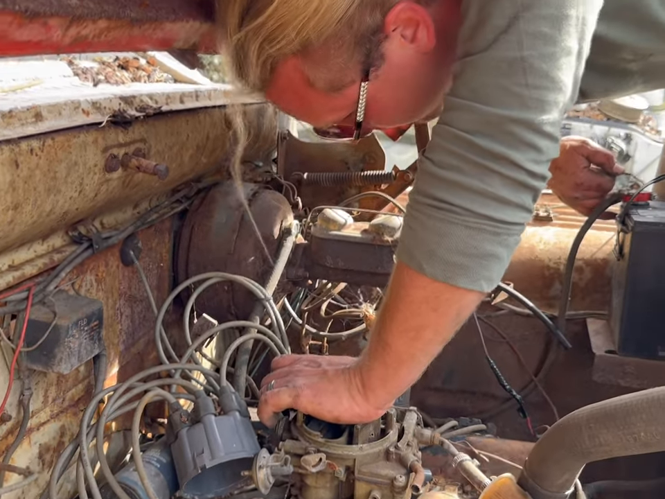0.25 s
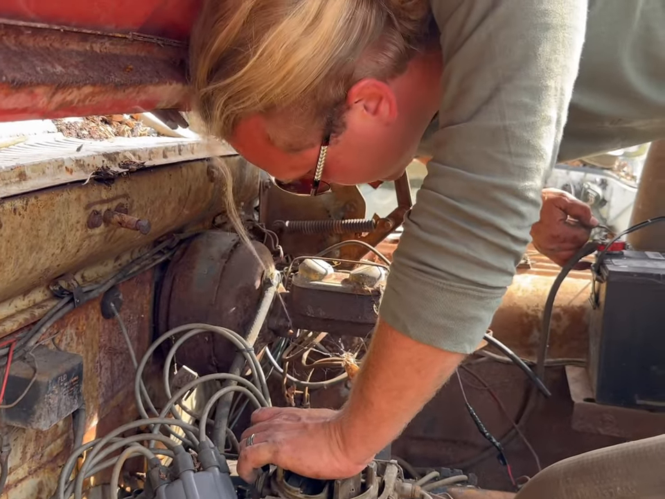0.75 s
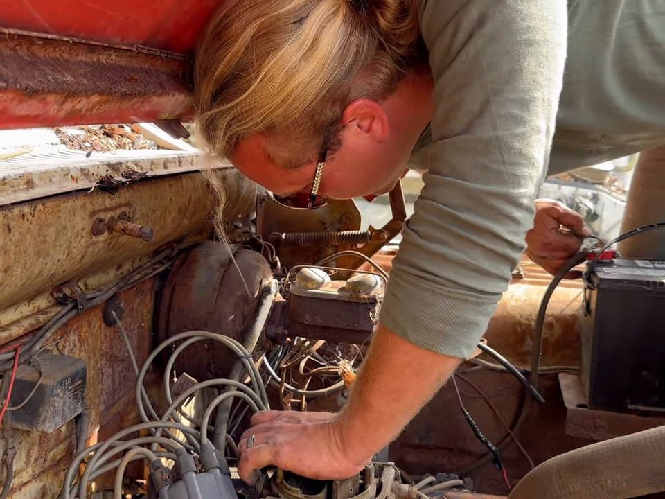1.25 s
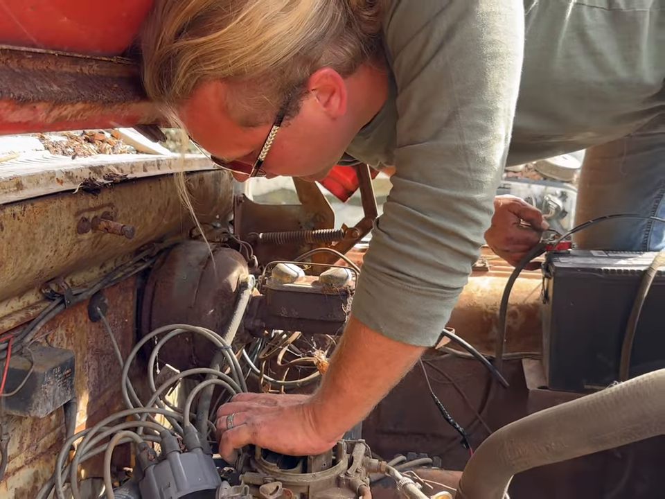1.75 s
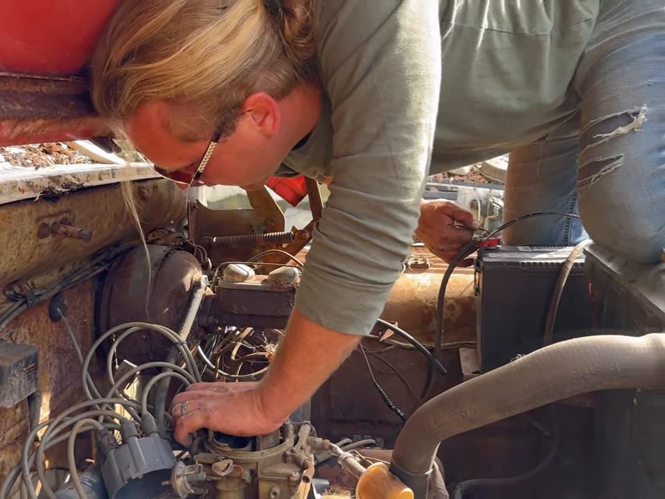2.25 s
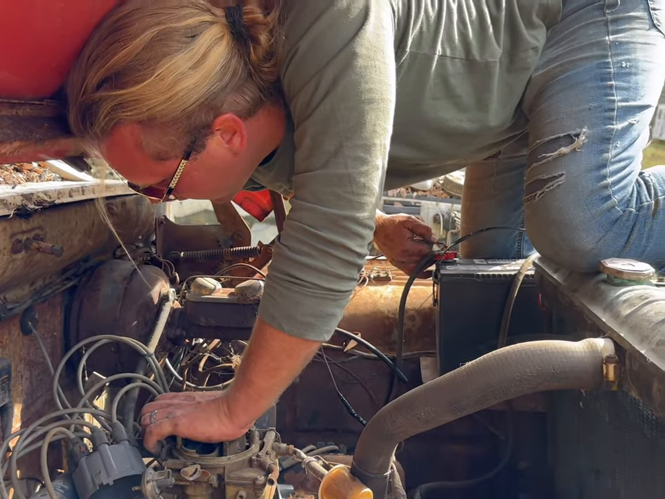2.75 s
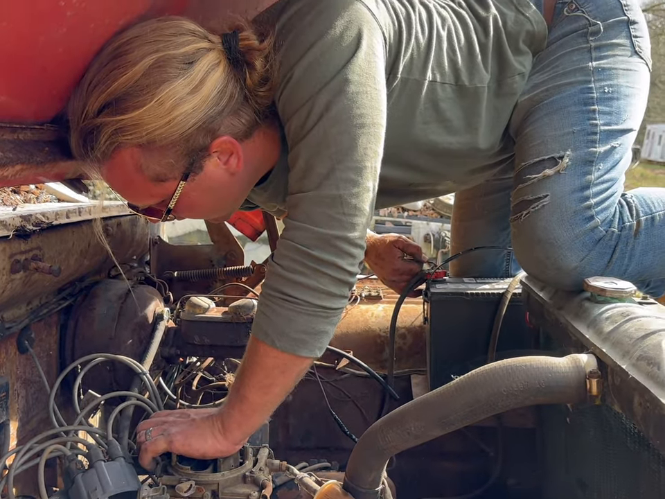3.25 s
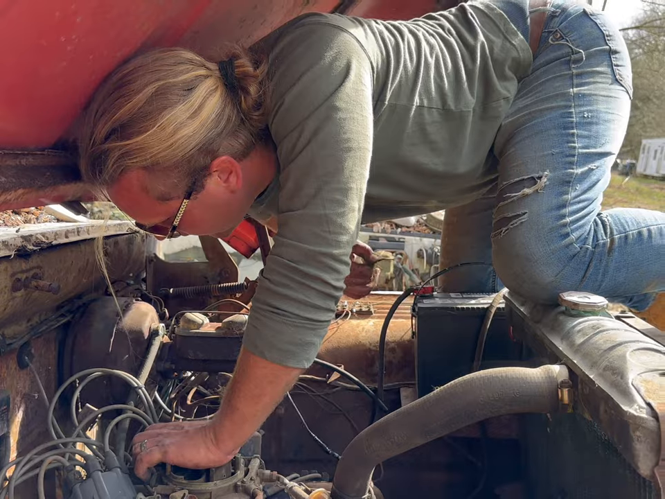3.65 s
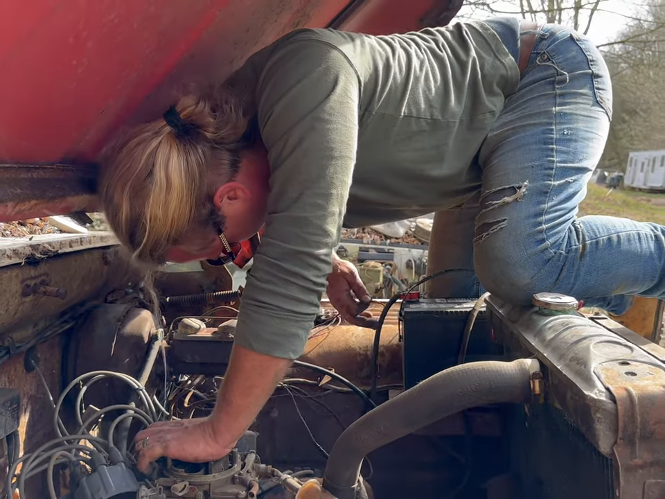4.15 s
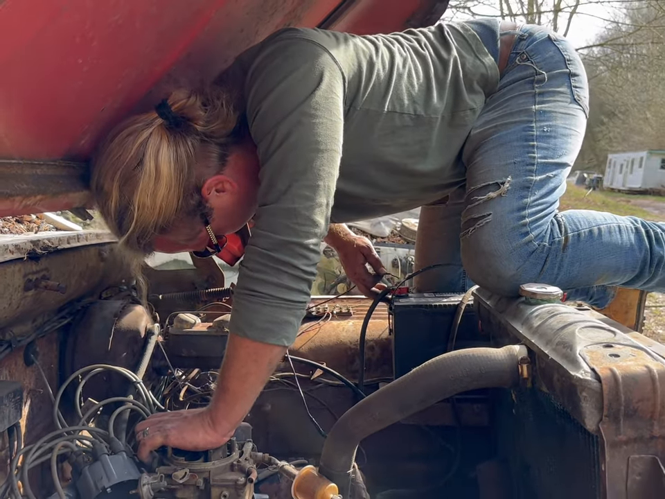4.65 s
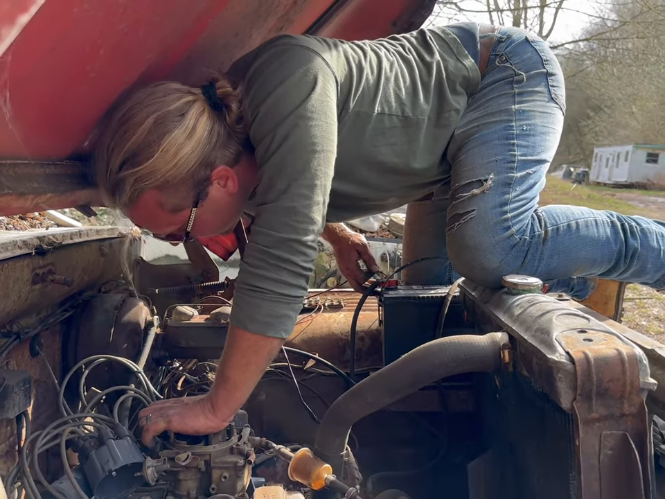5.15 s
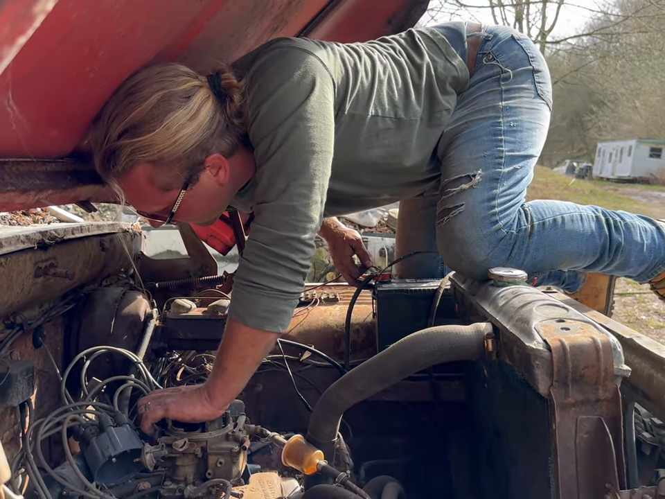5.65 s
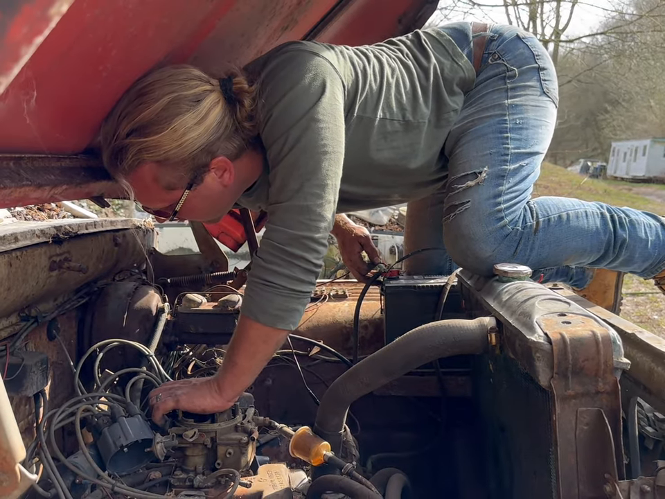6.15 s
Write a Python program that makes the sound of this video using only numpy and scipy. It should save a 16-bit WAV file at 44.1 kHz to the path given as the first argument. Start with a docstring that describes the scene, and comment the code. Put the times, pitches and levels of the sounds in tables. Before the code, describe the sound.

A solenoid clacks and the starter of an old truck cranks the engine for nearly three seconds, a grinding whine that dips at each compression, with soft hollow puffs and brief hisses. It does not fire, and coasts to rest with a few faint metal ticks. A second, slightly quieter try follows and also fails to catch. The sound is heard outdoors, close beside the open engine bay.

```python
"""Old truck engine failing to start

The starter cranks twice without firing, heard beside the open engine bay. The solenoid clacks;
the pinion grinds and whines on the ring gear, slowing at each compression. Cylinders puff into a
ringing pipe, a weak one hisses. After the first try the engine coasts to rest with a few ticks."""
import sys
import numpy as np
from scipy import signal
from scipy.fft import rfft, irfft, next_fast_len
from scipy.io import wavfile
from scipy.ndimage import uniform_filter1d, map_coordinates

SR = 44100
rng = np.random.default_rng(int(sys.argv[2]) if len(sys.argv) > 2 else 0)


def wav_out(sig):
    """Save sig, one row per channel (or a flat mono array), as 16-bit PCM at SR to the path in sys.argv[1]."""
    wavfile.write(sys.argv[1], SR, np.round(np.clip(np.atleast_2d(sig).T, -1, 1) * 32767).astype(np.int16))


N = 282328
TIME = np.arange(N) / SR
CRANK_HZ = 1150  # usual tooth rate

# starter engaged: on_s, off_s, hum_db
TRIES = [(0.711, 3.38, -11), (4.996, 6.5, -15)]
# compressions, with a double gap at a weak cylinder: time_s, base_tooth_hz, mesh_accent_db
COMPRESSIONS = [(0.854, 965, 3.5), (0.987, 865, -0.5), (1.136, 995, 5), (1.264, 1104, 3.5),
                (1.386, 1028, 4.5), (1.501, 1197, 0), (1.73, 1103, 4), (1.846, 1024, 0.5),
                (1.97, 1227, 3.5), (2.085, 1134, 4), (2.201, 1190, 2), (2.317, 1006, -3), (2.442, 1214, 2),
                (2.675, 1077, -0.5), (2.793, 990, -2), (2.921, 1205, -2.5), (3.036, 1150, 2),
                (3.156, 1120, -2), (3.271, 1045, -1), (3.401, 1100, 3), (5.192, 728.0, -3),
                (5.361, 828, 3.5), (5.498, 1125, -5), (5.621, 1114, 6.5), (5.736, 1120, -4),
                (5.856, 1003, 1.5), (5.973, 1144.0, -2), (6.213, 1068.0, -1.5), (6.332, 967, 3),
                (6.426, 1250, -6)]
# gear levels as the listener draws back: time_s, impact_db, rasp_db
GEAR_LEVELS = [(0.8, -23, -29), (1.08, -26.5, -31.5), (1.45, -28.5, -32), (1.85, -32, -35.5),
               (2.4, -34, -37.5), (3.35, -33.5, -40), (5.05, -31, -43.5), (5.55, -34.5, -42),
               (6.4, -34.5, -42.5)]
# bell housing and engine bay resonances: centre_hz, width_hz, gain_db
BAY_MODES = [(283.5, 26, 7), (557, 42, -0.5), (875, 77, 3.5), (969, 17, 7), (1095.6, 30, 7), (1298, 19, 5),
             (1403, 45, 3), (1522, 62, 7.5), (1739, 97, 9.5), (1870, 130, 1), (2333, 49, 0), (2510, 65, -1),
             (2750, 60, -4)]


def grind(teeth, speed, scatter_db, chatter_db, decay_per_tooth, diffuse_gain, worn_share, free_db):
    """Each tooth lands with its own force, harder at speed, and scrapes, partly alike every turn."""
    impact_spectrum = [(60, -36.5), (140, -15.5), (210, -5.5), (290, -16), (380, -14.5), (580, -5),
                       (750, -3), (950, -2), (1400, -4.5), (2000, -4.5), (2500, -1.5), (3000, -9),
                       (4000, -16.5), (8000, -52.5), (16000, -60)]  # tooth impacts: freq_hz, level_db
    rasp_spectrum = [(1500, -25.5), (3200, 4.5), (4000, -0.5), (5300, 0), (6400, 1.5), (7100, -7),
                     (8000, -4), (10000, -6), (11300, -51.5), (13000, -9.5), (16000, -9.5)]  # flank scrape: freq_hz, level_db
    force_db = scatter_db * rng.standard_normal(16384)[teeth.astype(int)]
    contact = unit(amp(force_db + chatter_db * wobble(170)) * np.exp(-decay_per_tooth * (teeth % 1)))
    impact_db, rasp_db = curves(GEAR_LEVELS)
    driven = engaged(rise_s=.0043, fall_s=.065)
    turning = speed * (driven + amp(free_db) * (1 - driven) * momentum() ** .76)
    worn = np.clip(worn_share * engaged(rise_s=.029, fall_s=.019), 0, 1)

    def scrape():
        flanks = np.sqrt(worn) * wear(teeth, slip_teeth=.018)
        friction = contact * (flanks + np.sqrt(1 - worn) * rng.standard_normal(N))
        impacts = coloured(friction, impact_spectrum) * amp(impact_db - 5)
        rasp = coloured(contact * rng.standard_normal(N), rasp_spectrum) * amp(rasp_db + .9)
        return bay(impacts * turning * momentum(), direct=.92) + rasp * turning

    return ports(scrape()) + diffuse_gain * np.array([scrape(), scrape()])


def wear(teeth, slip_teeth):
    """Worn flanks recur every eight teeth: dense lines gliding with the speed."""
    flanks = rng.standard_normal(256)
    turns = (teeth + slip_teeth * wobble(70)) / 8
    return unit(np.interp(turns % 1, np.arange(256) / 256, flanks, period=1))


def whine(teeth, tooth_hz, mesh_db, overtone_db, slack_db, slack_hz_per_s, sing_hz):
    """At speed the motor hums and the mesh sings; the teeth go slack as the engine springs ahead."""
    motor_orders = [(.25, 1.5), (.5, 5)]  # motor hum: tooth_rate_multiple, level_db
    mesh_orders = [(.75, -12), (1, 3.5), (1.25, -8.5), (1.5, -15.5)]  # mesh and side tones: tooth_rate_multiple, level_db
    impact_orders = [(1.75, -17.5), (2, 0), (3, -14.5)]  # impact overtones: tooth_rate_multiple, level_db
    impact_db, _ = curves(GEAR_LEVELS)
    hum_db, = curves([(s, db) for on, off, db in TRIES for s in (on, off)])
    _, accent_db = curves(COMPRESSIONS)
    slack = np.clip(np.gradient(tooth_hz) * SR / slack_hz_per_s, 0, 1)
    hum = partials(teeth, tooth_hz, motor_orders, direct=.25, flutter_db=3, rough=.068, slip_rad=.18)
    mesh = partials(teeth, tooth_hz, mesh_orders, direct=.4, flutter_db=2.6, rough=.3, slip_rad=.4)
    bite = partials(teeth, tooth_hz, impact_orders, direct=.45, flutter_db=3, rough=.35, slip_rad=.45)
    tones = np.minimum(tooth_hz / CRANK_HZ, 1) ** 2 * (amp(hum_db) * hum + amp(overtone_db) * bite)
    tones += amp(mesh_db + accent_db - slack_db * slack) * mesh
    singing = np.minimum(tooth_hz / sing_hz, 1) ** 5 * engaged(rise_s=.08, fall_s=.02)
    return tones * amp(impact_db) * singing


def partials(teeth, tooth_hz, orders, direct, flutter_db, rough, slip_rad):
    """Tones locked to the gear surge at resonances; uneven teeth make them flutter."""
    out = np.zeros(N)
    phase = 2 * np.pi * teeth + slip_rad * wobble(90)
    for order, db in orders:
        gain = amp(db + flutter_db * wobble(55)) * (1 + rough * wobble(300))
        out += gain * surge(order * tooth_hz, direct) * np.sin(order * phase + rng.uniform(0, 2 * np.pi))
    return out


def tooth_rate(recovery_hz_per_s, spin_up_s):
    """The starter spins up, is braked by each compression and regains more speed in longer gaps."""
    tooth_hz = np.zeros(N)
    for on, off, _ in TRIES:
        times, slow_hz = np.transpose([(s, hz) for s, hz, _ in COMPRESSIONS if on < s < off + .1])
        times, slow_hz = np.r_[on, times], np.r_[slow_hz[0], slow_hz]
        steps = np.arange(len(times))
        stroke, phase = np.divmod(np.interp(TIME, times, steps), 1)
        base_hz = np.interp(stroke + (1 - np.cos(np.pi * phase)) / 2, steps, slow_hz)
        gap_s = np.r_[np.diff(times), 0][stroke.astype(int)]
        swing_hz = recovery_hz_per_s * gap_s * np.sin(np.pi * phase ** 1.056) ** 1.63  # peaks past mid-gap
        spin_up = 1 - .55 * np.exp(-np.abs(TIME - on) / spin_up_s)
        tooth_hz = np.where(TIME >= on, (base_hz + swing_hz) * spin_up, tooth_hz)
    return tooth_hz * momentum()


def engaged(rise_s, fall_s):
    """1 while the starter drives, with a ramp up and a dying tail."""
    return sum(np.clip((TIME - on) / rise_s, 0, 1) * np.exp(-np.maximum(TIME - off, 0) / fall_s)
               for on, off, _ in TRIES)


def momentum(coast_s=.75):
    """1 while cranked, then falling evenly to rest."""
    return sum((TIME >= on) * np.clip(1 - (TIME - off) / coast_s, 0, 1) for on, off, _ in TRIES)


def blows():
    """Solenoid clacks, backlash knocks through the housing, loose metal ticks; soft, low handling bumps."""
    # strikes of each kind: start_s, level_db
    clack_hits = [(0.692, -32.5), (0.7121, -8), (4.9952, -21), (5.1841, -20.5)]
    knock_hits = [(0.746, -10), (0.768, -1), (0.791, -6), (0.81, -2), (0.829, -1.5), (0.905, -17),
                  (1.094, -13.5), (1.797, -19.5), (2.064, -19.5), (5.038, -22), (5.067, -16.5), (5.09, -20),
                  (5.112, -10)]
    tick_hits = [(3.6342, -38.5), (3.668, -39.5), (3.7249, -38), (3.8112, -47.5), (3.8383, -40),
                 (3.8743, -46), (3.8964, -51.5), (4.0024, -60), (4.3964, -58), (4.5294, -61),
                 (4.7116, -53.5), (4.9477, -49)]
    bump_hits = [(0.017, -55.5), (0.048, -62), (4.399, -51), (4.449, -55.5), (4.551, -48), (4.589, -55)]
    # their spectra: freq_hz, level_db
    clack_spectrum = [(80, -24.5), (400, -8.5), (1300, 3.5), (3000, -6), (5000, -3.5), (7000, -8),
                      (10000, -23.5), (16000, -18)]
    knock_spectrum = [(200, -23.5), (600, -13.5), (950, 5.5), (1300, -8.5), (2500, -18), (8000, -47.5)]
    tick_spectrum = [(200, -4.5), (2000, 6), (3600, -6), (6000, -4), (9000, -16.5), (16000, -43)]
    bump_spectrum = [(40, -10), (160, 3), (300, -3), (450, -25), (1000, -22), (3000, -41), (10000, -50.5)]
    clacks = amp(-3) * coloured(bursts(clack_hits, t60_s=.069), clack_spectrum)
    knocks = amp(-13) * bay(coloured(bursts(knock_hits, t60_s=.05), knock_spectrum), direct=1)
    ticks = amp(-5.5) * coloured(bursts(tick_hits, t60_s=.03), tick_spectrum)
    bumps = amp(-5) * coloured(bursts(bump_hits, t60_s=.1), bump_spectrum)
    return clacks + knocks + ticks + bumps


def puffs(ring_hz, sag, settle_s, t60_s):
    """Each puff rings the pipe, whose note starts low and rises as the valve shuts."""
    cylinder_puffs = [(0.747, -30.5), (0.856, -29.5), (1.118, -32), (1.246, -30), (1.488, -34),
                      (1.857, -28.5), (2.187, -34), (2.428, -35.5), (2.803, -34), (3.137, -37),
                      (3.382, -38.5), (5.716, -43), (5.961, -39), (6.338, -38.5)]  # air into the pipe: start_s, level_db
    out, t = np.zeros(N + SR), np.arange(SR // 3) / SR
    phase = 2 * np.pi * np.cumsum(ring_hz * (1 - sag * np.exp(-t / settle_s))) / SR
    ring = -np.sin(phase) * amp(-60 * t / t60_s) * (1 - np.exp(-t / .00067))
    push = -np.sin(2 * np.pi * 85 * t) * amp(-60 * t / .033)
    for s, db in cylinder_puffs:
        out[round(s * SR):][:len(t)] += amp(db) * (ring + amp(-7) * push)
    return out[:N]


def leaks():
    """A weak cylinder loses its compression in a short hiss."""
    hisses = [(1.576, -32.5, 0.062), (2.532, -32.5, 0.043), (3.478, -39, 0.069), (6.064, -37, 0.04)]  # air escapes: centre_s, level_db, half_length_s
    spectrum = [(500, -22), (3000, -13), (6000, -1), (10000, -13), (15000, -1.5)]  # hiss: freq_hz, level_db
    return noise(spectrum) * sum(amp(db) * np.exp(-((TIME - s) / half_s) ** 2) for s, db, half_s in hisses)


def rumble(tooth_hz, heave_db, throb_db, distance_power, lumpy_db, common_gain):
    """The block heaves at each compression, fading fast with distance; air rumbles on the ports."""
    spectrum = [(25, -30), (45, -4), (70, 2.5), (110, -1.5), (170, -10), (300, -29), (1000, -51)]  # block and breeze: freq_hz, level_db
    breeze = [(0.05, -47.5), (0.22, -59), (0.65, -51), (3.9, -68.5), (4.9, -78.5)]  # air on the microphone: time_s, level_db
    impact_db, _ = curves(GEAR_LEVELS)
    breeze_db, = curves(breeze)
    sag_hz = uniform_filter1d(tooth_hz, size=SR // 8) - tooth_hz
    load = np.tanh(sag_hz / 50) * engaged(rise_s=.18, fall_s=.04)
    distance_db = distance_power * (impact_db - impact_db.max())
    block = amp(heave_db + distance_db + throb_db * load) * momentum() ** 2
    low = unit(common_gain * ports(noise(spectrum)) + np.array([noise(spectrum), noise(spectrum)]))
    return low * np.hypot(block, amp(breeze_db)) * amp(lumpy_db * wobble(17))


def coasting(level_db, churn_db):
    """With the starter off, crank and rods churn dully until the engine rests."""
    spectrum = [(100, -13.5), (200, -5), (300, 5), (400, -2), (600, -6), (1000, -11), (3000, -40)]  # crankcase: freq_hz, level_db
    free = momentum() * (momentum() < 1)
    return noise(spectrum) * free * amp(level_db + churn_db * wobble(25))


def bay(x, direct):
    """Housing and sheet metal ring with what passes through; a share comes straight."""
    return filtered(x, lambda f: direct + sum(amp(db) * 1j * f * width / (hz**2 - f**2 + 1j * f * width)
                                              for hz, width, db in BAY_MODES))


def surge(hz, direct):
    """Gain of a tone sweeping through the housing resonances."""
    power = sum(amp(db) ** 2 / (1 + (2 * (hz - centre) / width) ** 2) for centre, width, db in BAY_MODES)
    return np.sqrt(direct ** 2 + power)


def hood(x):
    """Short diffuse ring between raised hood and bay walls; the bass escapes."""
    decay = [(150, 0.16), (1000, 0.23), (4000, 0.067), (12000, 0.025)]  # echo length: freq_hz, t60_s
    strength = [(150, -28), (500, -13), (1100, -11), (2000, -5), (5000, -2)]  # echo strength: freq_hz, gain_db
    hz, t, bins = signal.stft(rng.standard_normal((2, SR // 3)), SR, nperseg=256)
    tail = signal.istft(bins * amp(-60 * t / along(decay, hz)[:, None]), SR, nperseg=256)[1]
    echo = signal.fftconvolve(x, tail / np.linalg.norm(tail[0]), axes=1)[:, :N]
    return filtered(echo, lambda f: amp(along(strength, f)))


def ports(x):
    """Two microphone ports hear the engine with different phase and level."""
    phase = [(100, -0.5), (500, 0.95), (1000, 1.08), (1200, 0.81), (1400, -2), (1720, -2.5), (2600, -8.5),
             (3500, -8), (6300, -16), (7300, -18), (9800, -21.5), (12500, -9.5), (13500, -30)]  # left minus right: freq_hz, phase_rad
    level = [(200, 2), (700, 1), (1100, 3), (2500, 3.5), (5000, 8), (8000, 5.5), (13000, -2)]  # left minus right: freq_hz, level_db
    sides = np.array([[.5], [-.5]])
    return filtered(x, lambda f: amp(sides * along(level, f)) * np.exp(1j * sides * along(phase, f)))


def outdoor_air(level_db):
    """Faint noise, drifting by about a decibel."""
    spectrum = [(80, -9.5), (170, -6.5), (310, -7.5), (450, -15.5), (800, -11.5), (1200, -11.5),
                (2200, -13), (3000, -22.5), (6000, -19), (9000, -48.5), (15000, -63.5)]  # open air: freq_hz, level_db
    return amp(level_db - wobble(4.3)) * np.array([noise(spectrum), noise(spectrum)])


def amp(db):
    """Decibels to gain."""
    return 10 ** (np.asarray(db) / 20)


def unit(x):
    """Scaled to rms 1."""
    return x / np.sqrt(np.mean(x ** 2) + 1e-20)


def along(points, hz):
    """(freq_hz, value) points read on a log axis."""
    freq_hz, values = np.transpose(points)
    return np.interp(np.log(hz + 1), np.log(freq_hz + 1), values)


def curves(rows):
    """One value per sample for each column after the time."""
    times, *columns = np.transpose(rows)
    return [np.interp(TIME, times, column) for column in columns]


def wobble(knots_per_s):
    """Smooth random curve."""
    knots = rng.standard_normal(4096)
    coarse = TIME[::16]
    return np.interp(TIME, coarse, map_coordinates(knots, [coarse * knots_per_s], mode="wrap"))


def filtered(x, response):
    """x through a complex frequency response."""
    size = next_fast_len(N + SR // 2)
    return irfft(rfft(x, size) * response(np.fft.rfftfreq(size, 1 / SR)), size)[..., :N]


def coloured(x, spectrum):
    """x through a minimum-phase filter of unit energy."""
    size = 4096
    cepstrum = irfft(np.log(amp(along(spectrum, np.fft.rfftfreq(size, 1 / SR)))))
    cepstrum[1:size // 2] *= 2
    cepstrum[size // 2 + 1:] = 0
    kernel = irfft(np.exp(rfft(cepstrum)))
    return signal.fftconvolve(x, kernel / np.linalg.norm(kernel))[:N]


def noise(spectrum):
    """Coloured noise of rms 1."""
    return unit(coloured(rng.standard_normal(N), spectrum))


def bursts(hits, t60_s):
    """A dying noise burst per (start_s, level_db) row."""
    out, t = np.zeros(N + SR), np.arange(SR // 4) / SR
    for s, db in hits:
        out[round(s * SR):][:len(t)] += amp(db - 60 * t / t60_s) * rng.standard_normal(len(t))
    return out[:N]


def scene():
    """Starter and engine under the hood, outdoor air behind."""
    tooth_hz = tooth_rate(recovery_hz_per_s=1250, spin_up_s=.05)
    teeth = np.cumsum(tooth_hz) / SR
    gears = grind(teeth, speed=tooth_hz / CRANK_HZ, scatter_db=.86, chatter_db=1.3, decay_per_tooth=1.3,
                  diffuse_gain=.62, worn_share=.33, free_db=-17)
    tones = whine(teeth, tooth_hz, mesh_db=3.5, overtone_db=-.5, slack_db=4, slack_hz_per_s=2800,
                  sing_hz=850)
    engine = ports(tones + blows() + leaks() + coasting(level_db=-58, churn_db=3.5)) + gears
    pipe = puffs(ring_hz=176.4, sag=.18, settle_s=.062, t60_s=.42)
    bass = rumble(tooth_hz, heave_db=-37, throb_db=.5, distance_power=1.7, lumpy_db=1.5, common_gain=.87)
    return engine + hood(engine) + pipe + bass + outdoor_air(level_db=-69.5)


def record(dry):
    """Soft clip of the highest peaks, then a steep treble roll-off."""
    ceiling, top_hz = .9, 15850
    rounded = dry / (1 + np.abs(dry / ceiling) ** 6) ** (1 / 6)
    return filtered(rounded, lambda hz: np.clip((top_hz - hz) / 400 + .5, 0, 1) ** 2)


dry = scene()
out = record(dry)
wav_out(out)
```